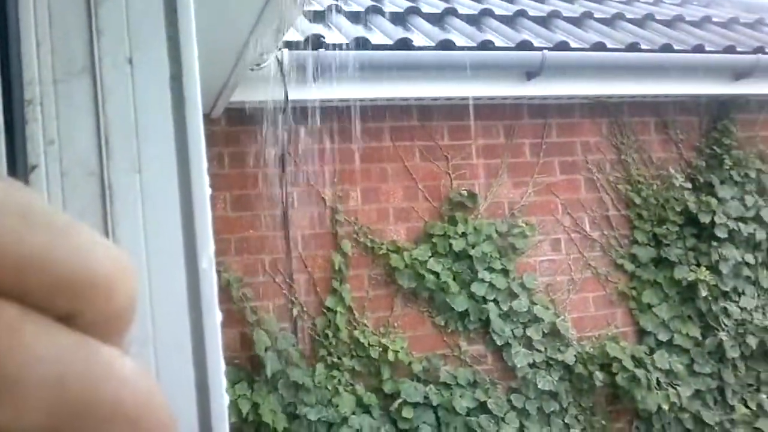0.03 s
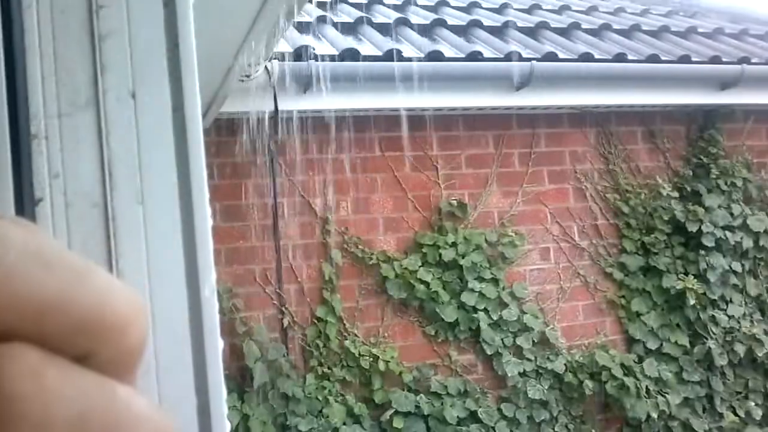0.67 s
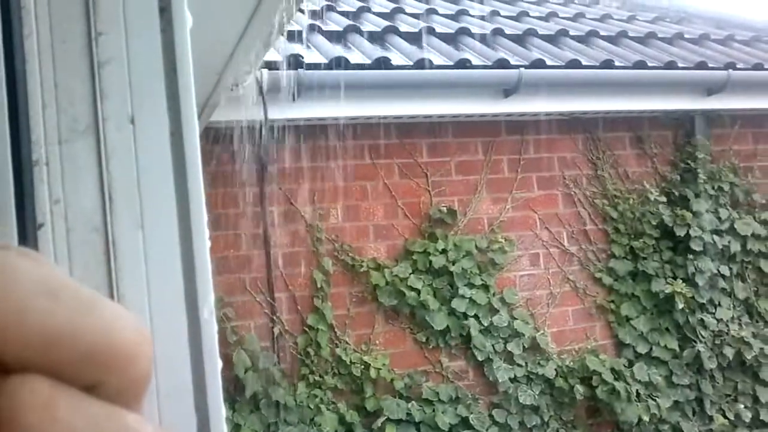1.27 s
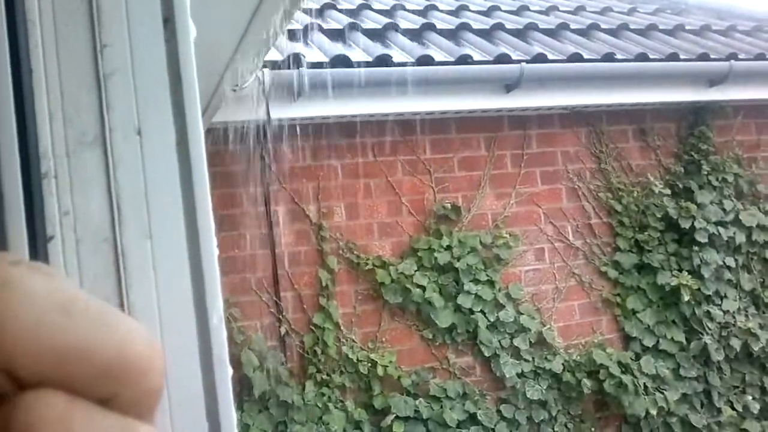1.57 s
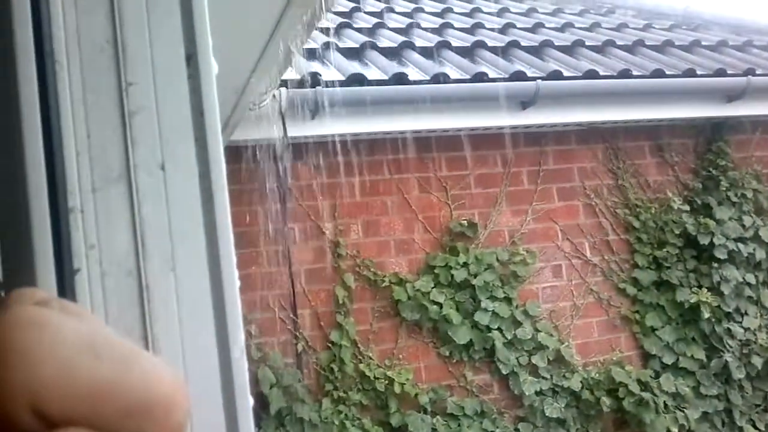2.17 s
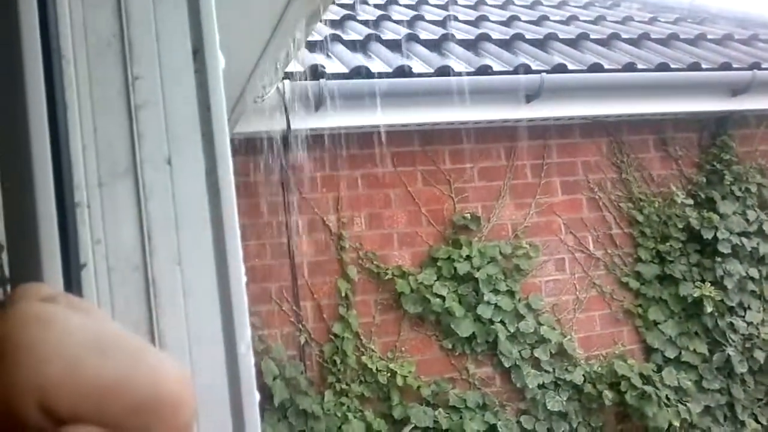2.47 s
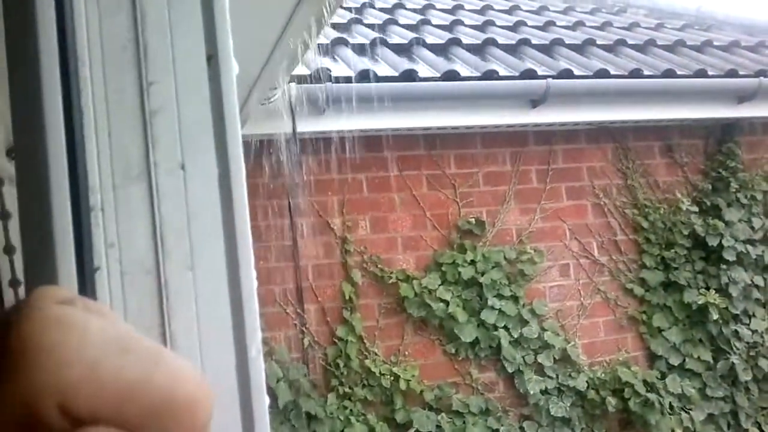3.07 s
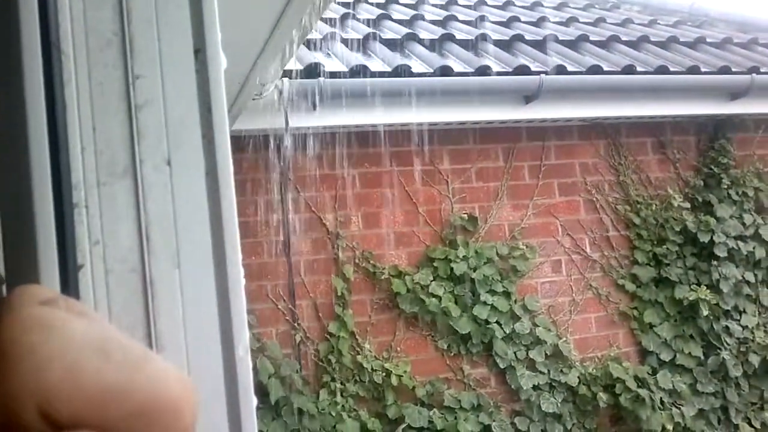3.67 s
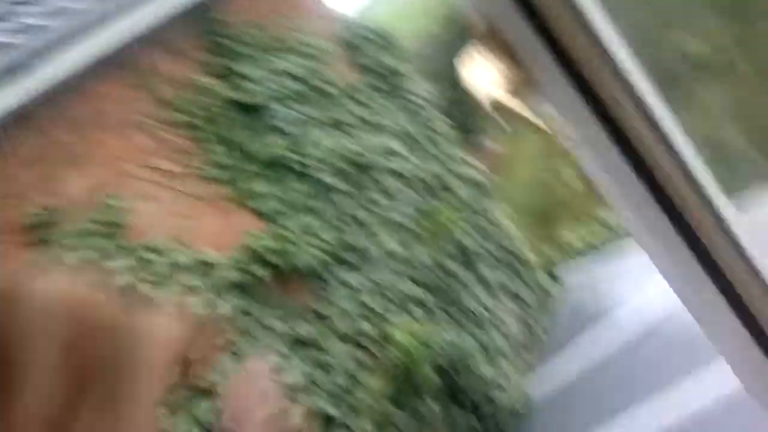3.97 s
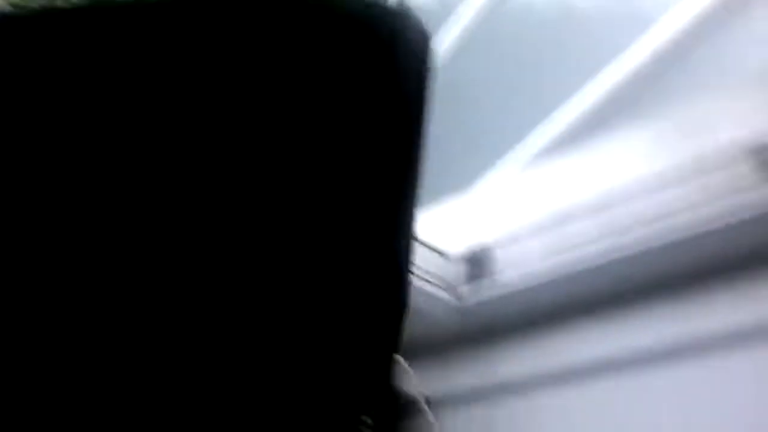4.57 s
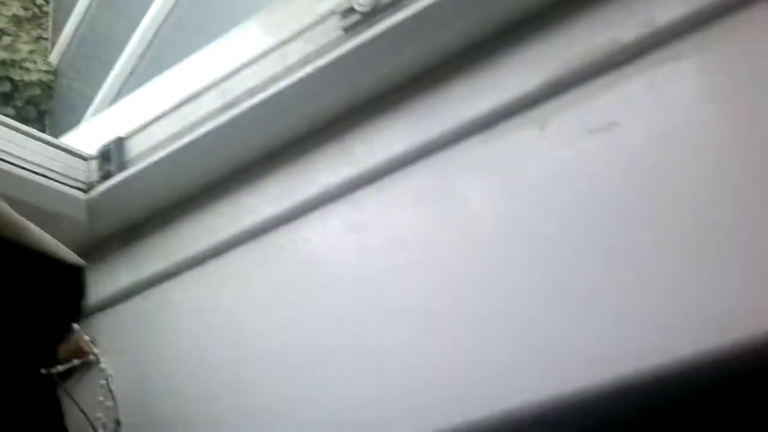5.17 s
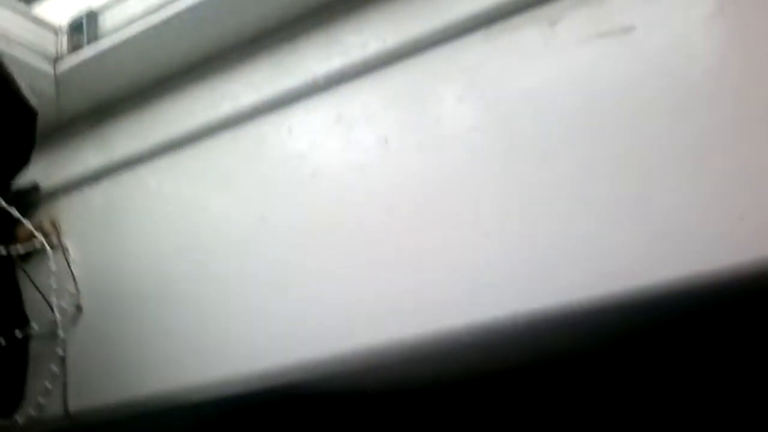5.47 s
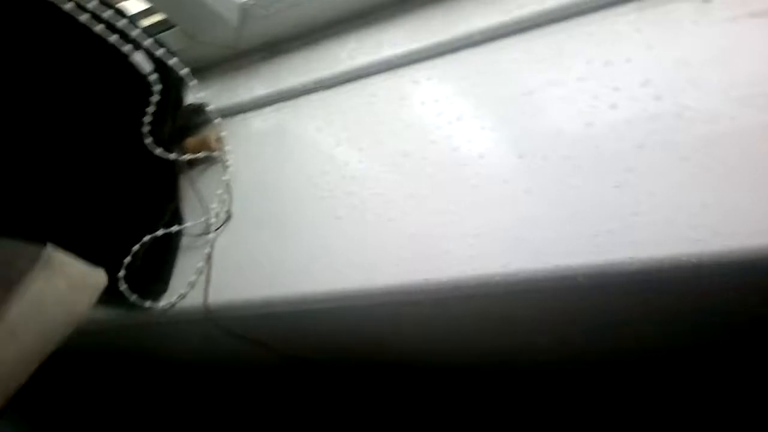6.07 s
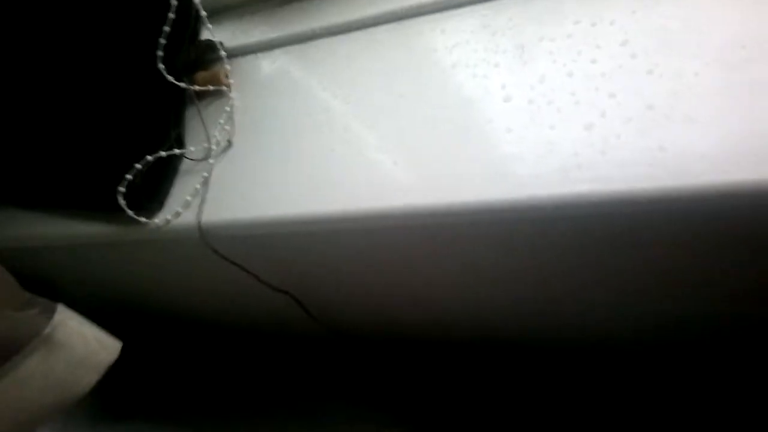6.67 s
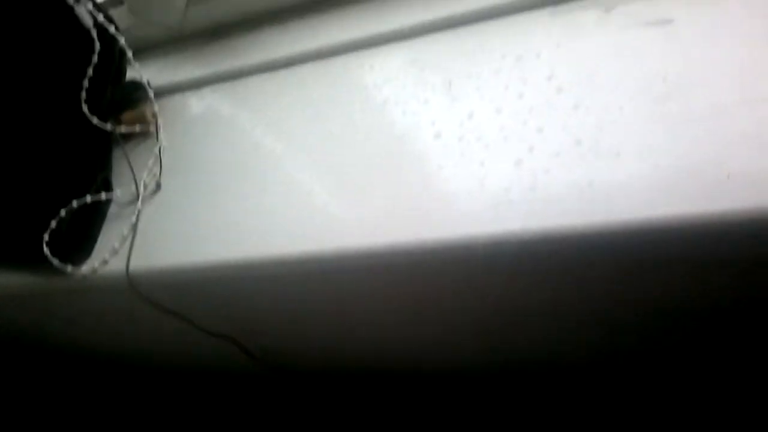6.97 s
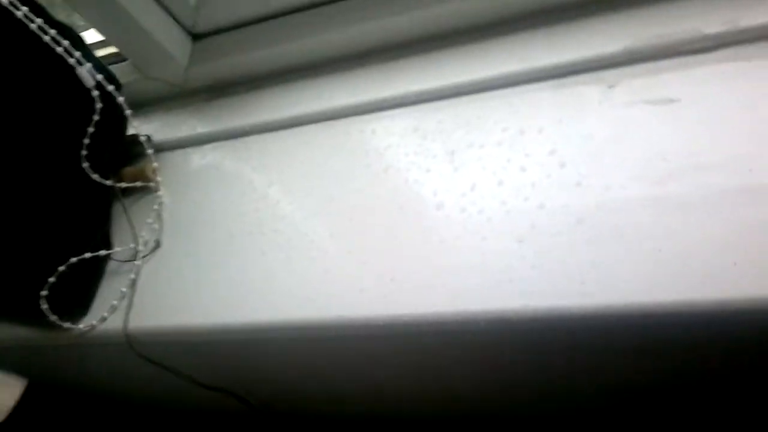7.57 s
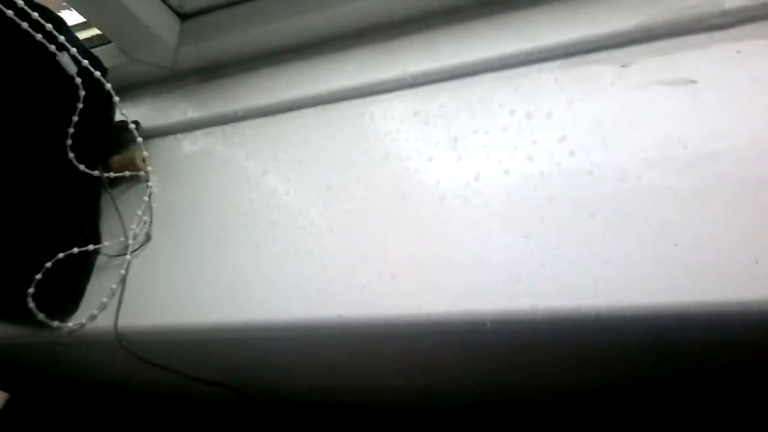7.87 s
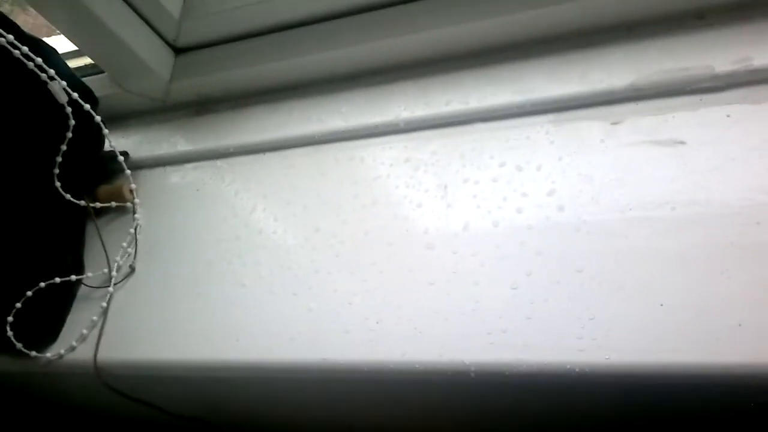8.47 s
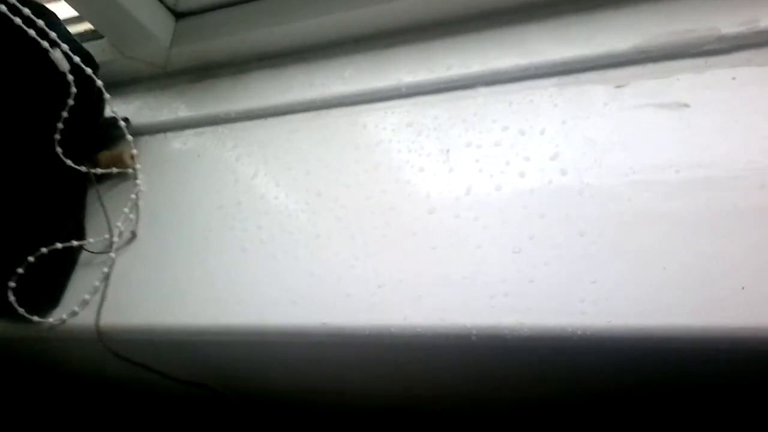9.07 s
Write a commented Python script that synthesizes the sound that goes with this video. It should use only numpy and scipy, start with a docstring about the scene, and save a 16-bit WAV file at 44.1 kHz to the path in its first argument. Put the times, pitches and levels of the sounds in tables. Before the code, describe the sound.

Heavy rain is heard from an open window, drumming on a plastic roof and hissing in leaves, while water from an overflowing gutter slaps and sprays irregularly for the first 3.5 seconds. At about 3.8 seconds the sound cuts out briefly. The rain returns at 4 seconds through the window gap, with a quick cluster of knocks on the hollow plastic frame and a metal clink at 4.5 seconds. The rain fades and dulls, slowly at first, then quickly after 6 seconds, with a few more knocks. The window shuts with a low thud and a short shudder at about 6.6 seconds. From there the rain is faint and muffled through the glass. A knock comes at 7.2 seconds and a small handle click near 7.9. A sleeve softly brushes and slides on the frame until just after 9 seconds, with very faint, thin squeaks around 8.5.

```python
"""A downpour at an open upstairs window: rain drums on a plastic roof below and hisses in ivy,
and an overflowing gutter slaps down. The sound cuts out for a moment; then the window is pulled in,
its frame knocking and its stay clinking as the gap narrows, and it thuds onto its seal.
Indoors the rain is faint and dull through the pane, with clicks of the handle
and a sleeve that brushes, slides and squeaks faintly on the frame."""
import sys
import numpy as np
from scipy import signal
from scipy.fft import rfft, irfft
from scipy.io import wavfile

SR = 44100
rng = np.random.default_rng(int(sys.argv[2]) if len(sys.argv) > 2 else 0)


def int16_out(signal):
    """Quantize to a 16-bit WAV file."""
    q = np.round(np.clip(np.atleast_2d(signal).T, -1, 1) * 32767)
    wavfile.write(sys.argv[1], SR, q.astype(np.int16))


N = 411007
TIME = np.arange(N) / SR

# tone of the rain leaning out, through the window gap and through the pane: f/Hz, level/dB
OUTSIDE_EQ = [(25, -10), (149, -6), (270, -1), (410, -13), (936, -14.5), (1130, -17.5), (1560, -9.5),
              (2410, -13), (3250, -16.5), (5880, -25), (12900, -22), (16000, -30.5)]
GAP_EQ = [(25, -14), (48, 1), (150, -2), (205, -4), (360, -0.5), (531, -4.5), (887, -9), (1700, -9),
          (2480, -11.5), (3430, -11), (4740, -25), (11300, -21.5), (16000, -27)]
PANE_EQ = [(25, -16.5), (60, -8.5), (190, -9), (260, -16), (700, -22.5), (1000, -31.5), (1500, -32),
           (2200, -29.5), (3200, -52), (7000, -56.5)]
# peaks and dips of roof and yard, window recess and plastic frame: f/Hz, width/Hz, level/dB
YARD_BELLS = [(202.7, 13, 7), (293, 65, -12.5), (394, 92, 9.5), (584, 116, 6.5), (937, 190, 6),
              (1100, 110, -2), (1774, 31, 5.5), (2420, 200, -6), (3305, 560, 7)]
RECESS_BELLS = [(195, 14, 9), (394, 44, 7.5), (1620, 640, 6.5)]
FRAME_BELLS = [(373, 100, 8.5), (609, 35, 10.5), (800, 56, 8), (1390, 880, 5)]
# gutter water slaps the roof: t/s, drum level/dB, splash level/dB
GUTTER_SLAPS = [(0.061, 0.5, -1), (0.545, 2.5, 0), (0.918, 1.5, 0), (1.088, -4.5, 3), (1.122, -1.5, -0.5),
                (1.258, -7, -1), (1.385, -15.5, -6), (1.747, -9, 1), (1.902, -6.5, 1), (2.022, -13.5, 1),
                (2.15, 1.5, 0.5), (2.371, -11, 1), (2.455, -22, 1), (2.598, -8.5, 2.5), (2.748, -16, 0),
                (2.894, -9.5, -1), (2.929, 1, 2), (3.098, -2.5, 2.5), (3.185, 2, 2), (3.323, 3, 2.5),
                (3.413, 1, -2), (3.466, -1, 2)]
# gutter water sprays into the ivy: t/s, level/dB
GUTTER_SPRAYS = [(0.028, 5), (0.477, 3.5), (0.706, -1), (1.399, 3), (1.632, 2), (1.913, 9), (1.998, 6.5),
                 (2.625, 8), (3.275, 1)]
# low thumps, an early one of wind or handling, then bumps as the window shuts: t/s, level/dB
LOW_THUMPS = [(0.555, -17), (6.169, -20), (6.22, -33), (6.327, -23), (6.556, -5.5), (6.603, -11.5),
              (6.645, -20), (7.885, -30.5), (8.959, -32)]
# low modes that voice the thumps: f/Hz, level/dB, t60/s
THUMP_MODES = [(41.7, 1, 0.22), (72.7, 3, 0.19), (158, -2, 0.16), (222, -7, 0.11), (372, -8, 0.16)]
# the window is pulled in, slowly at first, then onto its seal: t/s, gap area/dB
GAP_AREA = [(4.03, -0.5), (5.95, -3.5), (6.25, -8.5), (6.5, -13), (6.53, -17), (6.62, -24), (6.8, -63)]
# knocks on the frame: t/s, level/dB, f/Hz, t60/s
FRAME_KNOCKS = [(4.113, -7.5, 2490, 0.14), (4.127, -16.5, 1450, 0.24), (4.225, -12.5, 2980, 0.12),
                (4.248, -13, 1210, 0.088), (4.291, -21, 947, 0.54), (4.326, -9, 1920, 0.11),
                (4.353, -15, 1080, 0.054), (4.544, -12, 1590, 0.03), (5.135, -12, 1690, 0.049),
                (6.176, -14.5, 1260, 0.031), (6.324, -14, 1500, 0.1), (6.561, -21.5, 1930, 0.053),
                (7.177, -21, 1430, 0.082), (7.283, -35.5, 744, 0.12), (7.521, -38, 640, 0.42),
                (8.166, -38, 714, 0.19), (8.854, -39, 1250, 0.19)]
# clinks of the metal stay and handle: t/s, level/dB, f/Hz
METAL_CLINKS = [(4.543, -6, 2010), (7.881, -27.5, 2040)]
# fader ride on the low rumble indoors: t/s, level/dB
RUMBLE_RIDE = [(7.09, -8), (7.19, -1.5), (8.16, 2.5), (8.24, -5), (8.31, 2.5), (8.73, -8), (8.79, 1)]
# a sleeve brushes the frame: t/s, rub level/dB, swish level/dB, half length/s
SLEEVE_STROKES = [(6.704, -45.5, -59.5, 0.041), (7.208, -43, -55.5, 0.11), (7.5, -42.5, -52, 0.089),
                  (7.684, -44.5, -67, 0.051), (7.896, -55, -80, 0.12), (8.08, -33, -70, 0.037),
                  (8.16, -49.5, -75, 0.043), (9.08, -43.5, -49, 0.064), (9.196, -41, -72, 0.035)]
# tone of the fabric's dull rub, bright swish and sliding scrape: f/Hz, level/dB
RUB_EQ = [(150, -12), (560, -11.5), (850, -15.5), (1500, -11.5), (2300, -18), (3200, -27.5), (4300, -33.5),
          (6500, -55), (9300, -42.5)]
SWISH_EQ = [(2500, -11), (3800, 9), (5400, -2), (6500, -38), (9000, -20), (11700, 7.5), (16000, -7)]
SCRAPE_EQ = [(800, -36), (2200, 8.5), (3700, 4), (5100, -16), (8600, -33), (11600, -7), (16000, -18)]
# the fabric slides in fits and starts: t/s, level/dB
SLIDE_RIDE = [(8.22, -66), (8.37, -54), (8.43, -59), (8.5, -55.5), (8.64, -71), (8.7, -51.5), (8.75, -64),
              (8.85, -63)]
# its thin squeaks: t/s, half length/s, top f/Hz, level/dB, waver/fraction of pitch
FABRIC_SQUEAKS = [(8.34, 0.035, 14300, -70, 0.012), (8.465, 0.045, 14350, -55, 0.005),
                  (8.7, 0.019, 11600, -55, 0.03), (8.812, 0.014, 11600, -62, 0.025)]


def from_db(db):
    """Decibels to gain."""
    return 10 ** (np.asarray(db) / 20)


def unit_rms(x):
    """Scale to rms 1."""
    return x / np.sqrt(np.mean(x ** 2) + 1e-20)


def ride(points):
    """A fader move: straight lines between (time, value) points."""
    return np.interp(TIME, *np.transpose(points))


def cut(x, hz, kind, order=2):
    """Butterworth filter."""
    return signal.sosfilt(signal.butter(order, hz, kind, fs=SR, output="sos"), x)


def eq(x, curve, bells=()):
    """Minimum-phase EQ from a broad curve and bell-shaped peaks or dips."""
    size = 2 ** 13
    hz = np.maximum(np.arange(size // 2 + 1) * SR / size, 1)
    curve_hz, curve_db = np.transpose(curve)
    db = np.interp(np.log(hz), np.log(curve_hz), curve_db)
    for centre, width, height in bells:
        db = db + height / (1 + (2 * (hz - centre) / width) ** 2)
    cepstrum = irfft(np.log(from_db(db)))
    cepstrum[1:size // 2] *= 2   # folded forward, so nothing rings ahead of a hit
    cepstrum[size // 2 + 1:] = 0
    return signal.fftconvolve(x, irfft(np.exp(rfft(cepstrum))))[:N]


def clicks(times, heights):
    """Single-sample hits."""
    out = np.zeros(N)
    np.add.at(out, np.round(np.asarray(times) * SR).astype(int), heights)
    return out


def surging(depth_db, hz):
    """A randomly wandering gain that makes a texture lumpy."""
    wander = cut(cut(rng.standard_normal(N), hz, "low"), hz, "low")
    return from_db(depth_db * unit_rms(wander))


def shower(per_s, spread_db, largest=4):
    """Hits land at random: many small, a few large, none beyond `largest` spreads."""
    sizes = from_db(spread_db * np.minimum(rng.exponential(1, N), largest))
    return (rng.random(N) < per_s / SR) * sizes * rng.choice([-1, 1], N)


def bursts(hits, t60, rise=0):
    """Each hit throws a noise burst that swells for `rise` seconds and dies away; their powers add."""
    power = signal.lfilter([1], [1, -from_db(-120 / (t60 * SR))], hits ** 2 + 1e-18)
    if rise:
        lag = np.exp(-1 / (rise * SR))
        power = signal.lfilter([1 - lag], [1, -lag], power)
    return np.sqrt(power) * rng.standard_normal(N)


def splashes(blobs, edges_hz, t60, rise, tint_db):
    """Larger blobs burst into spray, each with its own strength in every band."""
    out = 0
    for band in zip(edges_hz, edges_hz[1:]):
        tint = np.ones(N)
        tint[blobs != 0] = from_db(tint_db * rng.standard_normal(np.count_nonzero(blobs)))
        out = out + cut(bursts(blobs * tint, t60, rise), band, "band")
    return unit_rms(out)


def drumming(drop_db, splash_db, wash_db):
    """Sharp drop impacts and longer splashes over the wash of distant rain."""
    drops = unit_rms(bursts(shower(per_s=380, spread_db=2.8), t60=0.005))
    blobs = shower(per_s=55, spread_db=2.8, largest=2.4)
    splash = splashes(blobs, (20, 500, 1300, 2500, 9000), t60=0.11, rise=0.0038, tint_db=3)
    wash = rng.standard_normal(N)
    return unit_rms(from_db(drop_db) * drops + from_db(splash_db) * splash + from_db(wash_db) * wash)


def ivy(tick_db, splash_db):
    """Fine spatter on leaves: ticks and short sprays in a hiss that surges as water comes in lumps."""
    ticks = unit_rms(bursts(shower(per_s=700, spread_db=3), t60=0.004))
    blobs = shower(per_s=90, spread_db=2.8, largest=2.4)
    splash = splashes(blobs, (3000, 6500, 9000, 12000, 16000), t60=0.067, rise=0.0018, tint_db=5.5)
    spatter = from_db(tick_db) * ticks + from_db(splash_db) * splash
    return unit_rms(surging(depth_db=-1.5, hz=23) * (spatter + rng.standard_normal(N)))


def wall_echoes(x, echo_db, longest_s):
    """Brickwork and the open pane add ten early reflections of the upper range."""
    lags = rng.uniform(0.002, longest_s, 10)
    echoes = sum(np.pad(x, (round(lag * SR), 0))[:N] * (-1) ** k for k, lag in enumerate(lags))
    return x + from_db(echo_db) * cut(echoes, 730, "high")


def downpour(roof_db, ivy_db, curve, bells, spray_db):
    """The rain bed: the roof carries the lows and mids, the leaves the treble."""
    water = cut(drumming(drop_db=-5, splash_db=-6, wash_db=0), 27, "high")
    roof = cut(eq(water, curve, bells), 4170, "low", order=4)
    leaves = cut(eq(ivy(tick_db=-6.5, splash_db=spray_db), curve, bells), 4380, "high", order=4)
    roof = wall_echoes(roof, echo_db=-23.5, longest_s=0.03)
    leaves = wall_echoes(leaves, echo_db=-21, longest_s=0.016)
    return from_db(roof_db) * unit_rms(roof) + from_db(ivy_db) * unit_rms(leaves)


def gutter(gain_db, smack_db, t60, rise):
    """Lumps of water drum on the roof and burst with a smack and a splash; some spray into the ivy."""
    slap_s, drum_db, splash_db = np.transpose(GUTTER_SLAPS)
    drum = cut(bursts(clicks(slap_s, from_db(drum_db)), t60, rise), [200, 1200], "band")
    hits = clicks(slap_s, from_db(splash_db))
    splash = bursts(hits, t60, rise) + from_db(smack_db) * bursts(hits, t60=0.0058)
    splash = cut(splash, [1200, 5200], "band")
    spray_s, spray_db = np.transpose(GUTTER_SPRAYS)
    leaves = cut(bursts(clicks(spray_s, from_db(spray_db)), t60, rise), 8400, "high")
    return from_db(gain_db) * eq(drum + splash + leaves, OUTSIDE_EQ, YARD_BELLS)


def ring(hits, hz, t60):
    """One struck mode: each hit starts a decaying sine of its own height."""
    decay, step = from_db(-60 / (t60 * SR)), 2 * np.pi * hz / SR
    return signal.lfilter([0, np.sin(step)], [1, -2 * decay * np.cos(step), decay ** 2], hits + 1e-18)


def stroke(centre_s, half_length_s, edge_s=0.017):
    """A soft-edged envelope: catch, hold, let go."""
    return 0.5 + 0.5 * np.tanh((half_length_s - np.abs(TIME - centre_s)) / (2 * edge_s))


def low_thumps(gain_db, soft_hz, rattle_db):
    """Soft hits ring low modes: wind or handling early on, then the window bumps shut and shudders."""
    thump_s, thump_db = np.transpose(LOW_THUMPS)
    hits = clicks(thump_s, from_db(thump_db))
    shudder = from_db(-15.5) * stroke(centre_s=6.81, half_length_s=0.11) * rng.standard_normal(N)
    rattle = cut(from_db(rattle_db) * bursts(hits, t60=0.22) + shudder, [24, 130], "band")
    modes = sum((-1) ** k * from_db(db) * ring(hits, hz, t60)
                for k, (hz, db, t60) in enumerate(THUMP_MODES))
    return from_db(gain_db) * cut(rattle + modes, soft_hz, "low")


def rain_through_gap(roof_db, ivy_db, slit_db):
    """Rain fades with the area of the gap; once that is narrow, hiss fades faster and the slit rings."""
    gap_db = ride(GAP_AREA)
    shadow_db = 0.87 * np.minimum(gap_db + 3, 0)   # a gap below -3 dB shades the hiss
    rain = downpour(roof_db + gap_db, ivy_db + gap_db + shadow_db, GAP_EQ, RECESS_BELLS, spray_db=-1.5)
    narrowness = np.clip(gap_db / -16.5, 0, 1) ** 2   # full resonance from -16.5 dB down
    slit = cut(rain, [350, 870], "band") + cut(rain, [1300, 2440], "band")
    return rain + narrowness * from_db(slit_db) * slit


def frame_knocks(ring_db, tail_db, tail_t60, tick_db, tick_t60):
    """Cracks in the hollow plastic frame: a hard tick, the struck part rings, the room's tail follows."""
    out = np.zeros(N)
    age = TIME[:SR // 2]
    for s, db, hz, t60 in FRAME_KNOCKS:
        grain = cut(rng.standard_normal(len(age)), [hz / 1.31, hz * 1.94], "band", order=1)
        grain = unit_rms(cut(grain, hz * 2, "low", order=3))
        tone = np.sin(2 * np.pi * hz * age)
        tick = tone * from_db(tick_db - 60 * age / tick_t60)
        crack = (grain + from_db(ring_db) * tone) * from_db(-60 * age / t60)
        tail = grain * from_db(tail_db - 60 * age / tail_t60)
        start = round(s * SR)
        out[start:start + len(age)] += (from_db(db) * (tick + crack + tail))[:N - start]
    return eq(out, [(60, -18.5), (300, 0.5), (2500, -10), (8000, -13.5)], FRAME_BELLS)


def fittings(t60, catch_s, catch_db):
    """The metal stay and handle ring briefly, damped by the hand; the catch scrapes into its keeper."""
    clinks = sum(ring(clicks([s], from_db([db])), hz, t60) for s, db, hz in METAL_CLINKS)
    scrape = unit_rms(cut(rng.standard_normal(N), [3000, 5200], "band", order=4))
    push = np.exp(-((TIME - catch_s) / 0.017) ** 2)
    return cut(clinks, 5000, "low") + from_db(catch_db) * push * scrape


def pane_rain_and_rumble(gain_db):
    """Faint steady rain through the pane, with a low rumble that dips briefly three times."""
    water = drumming(drop_db=-3, splash_db=-11, wash_db=-2.5)
    patter = unit_rms(eq(water, PANE_EQ, RECESS_BELLS))
    rumble = cut(patter, 700, "low", order=1)
    return from_db(gain_db) * (patter + (from_db(ride(RUMBLE_RIDE)) - 1) * rumble)


def sleeve_brushes(grain_db):
    """Fibres catch and slip under each smooth stroke: a dull rub and a bright swish."""
    rub_gain, swish_gain = sum(from_db([[rub_db], [swish_db]]) * stroke(s, half_length)
                               for s, rub_db, swish_db, half_length in SLEEVE_STROKES)
    catches = unit_rms(shower(per_s=2500, spread_db=3))
    friction = (from_db(grain_db) * catches + rng.standard_normal(N)) * surging(depth_db=2, hz=70)
    rub = cut(eq(friction, RUB_EQ), 12500, "low", order=4)
    swish = eq(friction, SWISH_EQ)
    return rub_gain * unit_rms(rub) + swish_gain * unit_rms(swish)


def sleeve_slide(grain_db):
    """Fabric slides unevenly over the frame: a grainy scrape."""
    sliding = (TIME > SLIDE_RIDE[0][0]) & (TIME < SLIDE_RIDE[-1][0])
    scrape = eq(rng.standard_normal(N), SCRAPE_EQ) * surging(grain_db, hz=150)
    return sliding * from_db(ride(SLIDE_RIDE)) * unit_rms(scrape)


def sleeve_squeaks(droop_hz_per_s2):
    """Each squeak arches in pitch as the fabric speeds up and slows; the short ones are rough."""
    out = 0
    for s, half_length, top_hz, db, waver in FABRIC_SQUEAKS:
        arch_hz = np.maximum(top_hz - droop_hz_per_s2 * (TIME - s) ** 2, top_hz / 2)
        wobble = 1 + waver * unit_rms(cut(rng.standard_normal(N), 300, "low"))
        swell = np.exp(-0.5 * ((TIME - s) / half_length) ** 2)
        out = out + from_db(db) * swell * np.sin(2 * np.pi * np.cumsum(arch_hz * wobble) / SR)
    return out * surging(depth_db=3, hz=60.4)


def scene():
    """Leaning out first, then behind the closing window; the seal shuts out the direct rain."""
    outside = downpour(roof_db=-20.5, ivy_db=-28, curve=OUTSIDE_EQ, bells=YARD_BELLS, spray_db=-2)
    outside += gutter(gain_db=1, smack_db=7, t60=0.13, rise=0.0015)
    behind_sill = rain_through_gap(roof_db=-21, ivy_db=-28, slit_db=-6)
    bed = np.where(TIME < 3.919, outside, behind_sill)   # the perspective switches inside the dropout
    bed += pane_rain_and_rumble(gain_db=-44)
    thumps = low_thumps(gain_db=-5, soft_hz=430, rattle_db=18.5)
    window = frame_knocks(ring_db=-8.5, tail_db=-16.5, tail_t60=0.27, tick_db=9, tick_t60=0.0051)
    window += fittings(t60=0.021, catch_s=7.905, catch_db=-56)
    cloth = sleeve_brushes(grain_db=-7.5) + sleeve_slide(grain_db=1.5)
    cloth += sleeve_squeaks(droop_hz_per_s2=100000)
    return (bed + thumps + window + cloth)[None]


def record(dry):
    """The sound drops out briefly, peaks are rounded and the very top is cut."""
    mute_from_s, mute_to_s, out_db_per_s, in_db_per_s = 3.809, 4.029, 3000, 3600
    mute_db = np.maximum(out_db_per_s * (mute_from_s - TIME), in_db_per_s * (TIME - mute_to_s))
    gated = dry * from_db(np.clip(mute_db, -80, 0))
    limited = 0.9 * np.tanh(gated / 0.9)
    return signal.sosfilt(signal.ellip(12, 0.1, 80, 15800, fs=SR, output="sos"), limited)


dry = scene()
out = record(dry)
int16_out(out)
```